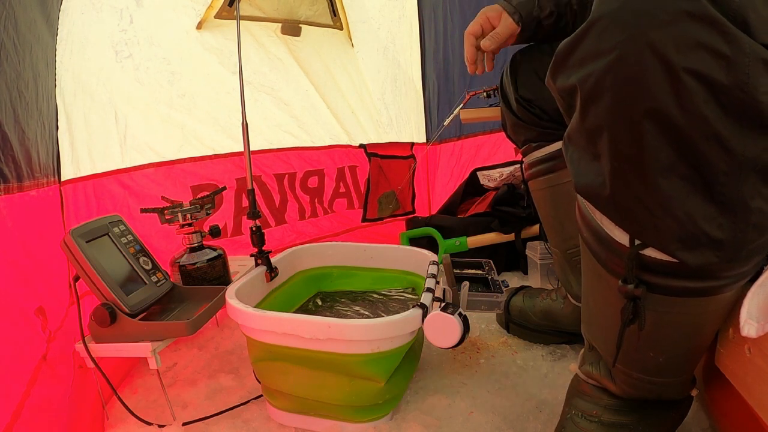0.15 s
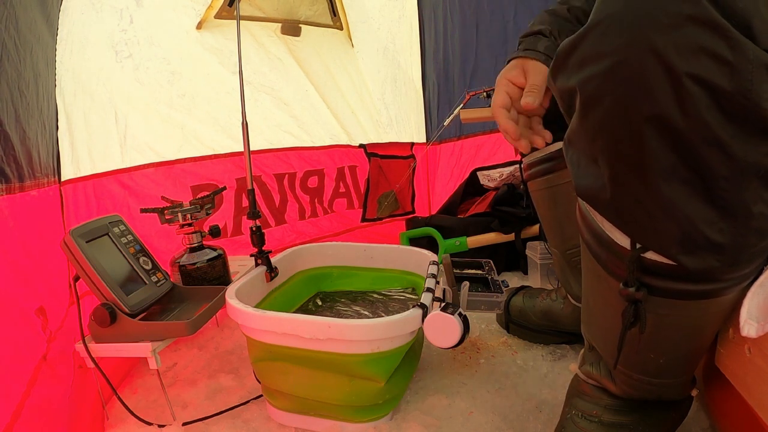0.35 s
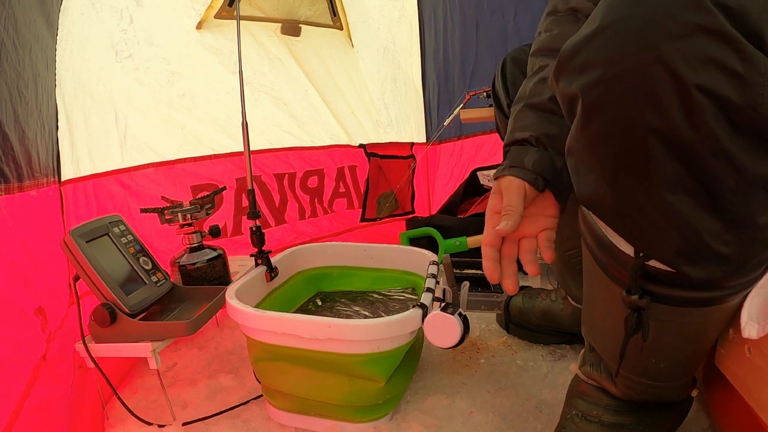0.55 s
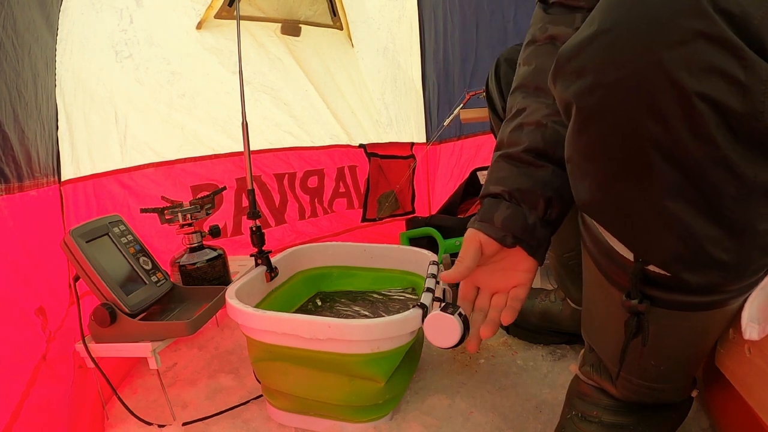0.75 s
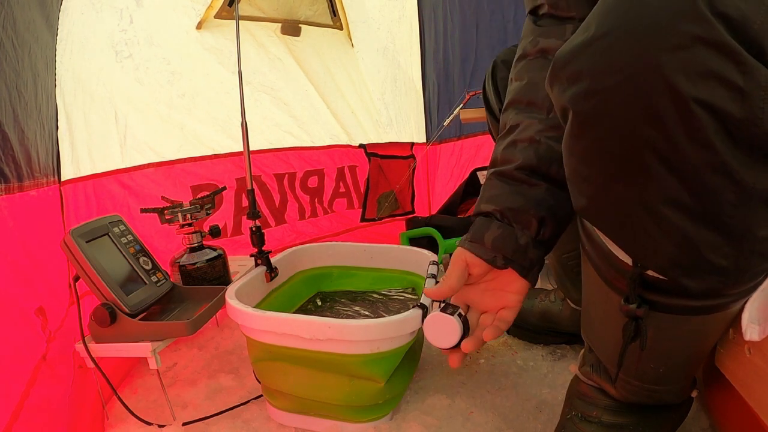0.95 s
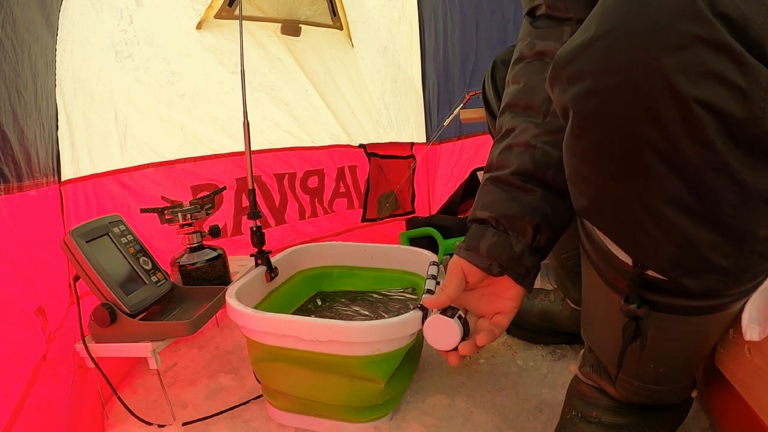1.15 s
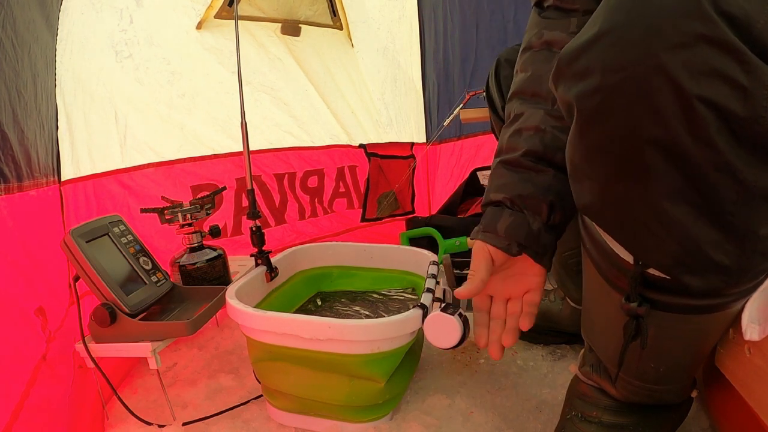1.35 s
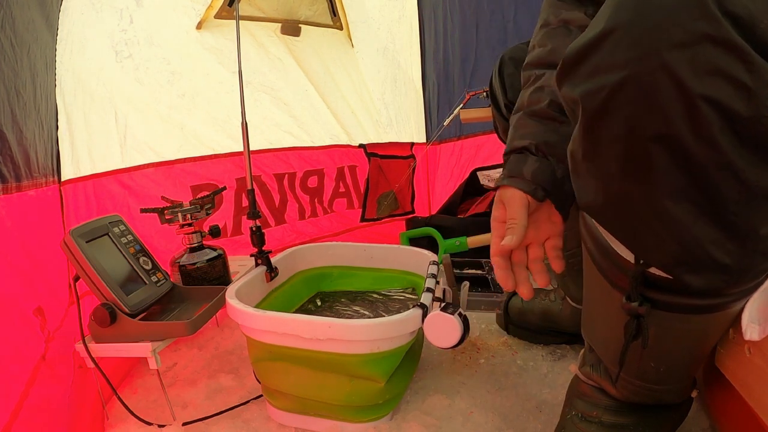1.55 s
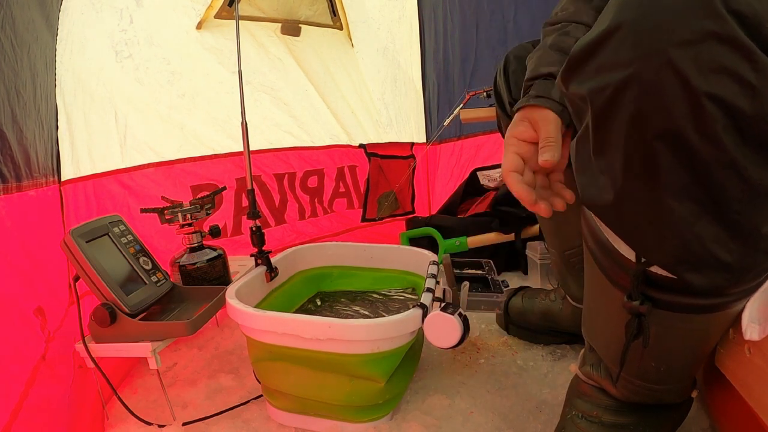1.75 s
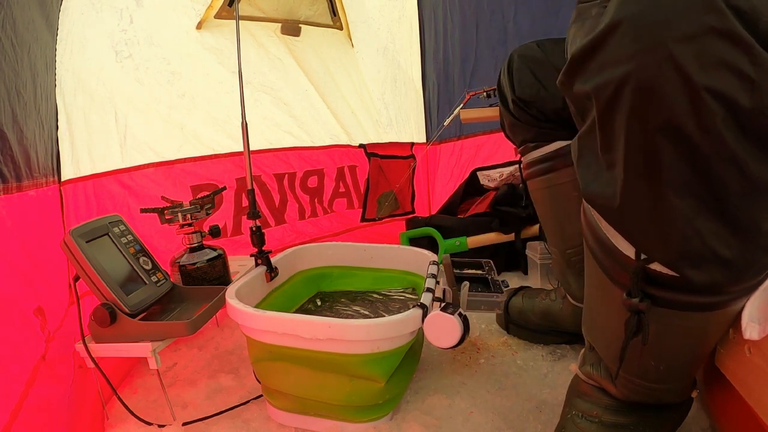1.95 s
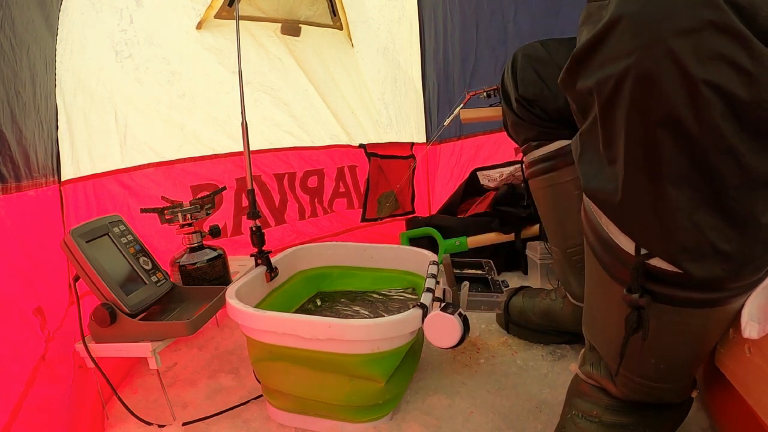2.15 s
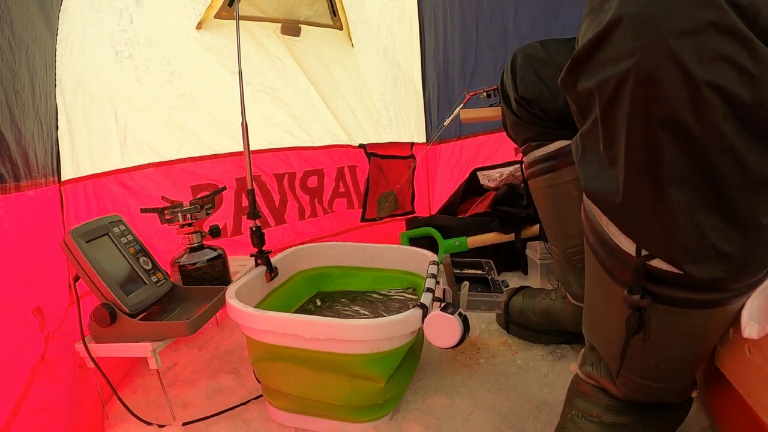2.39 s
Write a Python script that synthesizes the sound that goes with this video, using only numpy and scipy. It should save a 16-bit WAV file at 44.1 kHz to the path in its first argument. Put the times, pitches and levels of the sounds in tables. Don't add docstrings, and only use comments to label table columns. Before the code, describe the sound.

A nylon sleeve swishes down and back, with a creaking plastic seat and a reel's catch clicking

```python
import sys
import numpy as np
from scipy import signal
from scipy.fft import rfft, irfft
from scipy.io import wavfile
from scipy.ndimage import uniform_filter1d

SR = 44100
rng = np.random.default_rng(int(sys.argv[2]) if len(sys.argv) > 2 else 0)


def volts_from_db(level):
    exponent = np.asarray(level, float) / 20
    return 10 ** exponent


def transcribe(u):
    v = np.clip(np.atleast_2d(u).T, -1, 1)
    q = np.round(v * 32767).astype(np.int16)
    wavfile.write(sys.argv[1], SR, q)


N = 112455


def evened(x):
    return x / np.sqrt(np.mean(x ** 2) + 1e-20)


def peaked(x):
    return x / abs(x).max()


def read(points, hz):
    f, value = np.transpose(points)
    return np.interp(np.log(hz + 1), np.log(f + 1), value)


def add(mix, s, sound):
    part = mix[round(s * SR):][:len(sound)]
    part += sound[:len(part)]


def peak(hz, centre_hz, width_hz):
    return 1 / np.sqrt(1 + (2 * (hz - centre_hz) / width_hz) ** 4)


def ring(modes, spread):
    hz, db, t60 = np.transpose(modes)[:, :, None]
    t = np.arange(6000) / SR
    level_chance, pitch_chance = rng.standard_normal((2, len(modes), 1))
    rise_cycles = .8
    rise = 1 - np.exp(-t * hz / rise_cycles)
    decay = volts_from_db(db + 1.5 * level_chance - 60 * t / t60)
    tone = np.sin(2 * np.pi * hz * (1 + spread * pitch_chance) * t)
    return (rise * decay * tone).sum(0)


def pair(a, b, gain):
    # (frequency [Hz], coherence [0-1])
    same = [(100, 0.86), (500, 0.44), (1200, 0.83), (2500, 0.7), (5000, 0.55), (12000, 0.08)]
    # (frequency [Hz], level [dB])
    lean = [(60, 1), (180, 1), (550, -2.5), (1650, 1.5), (4970, 4.5), (15000, -1.5)]
    lag_s = .00005
    hz = np.fft.rfftfreq(N, 1 / SR)
    shared, tilt = read(same, hz), volts_from_db(read(lean, hz) / 2)
    one, two = rfft(a), rfft(b)
    right = shared * one * np.exp(2j * np.pi * hz * lag_s) + np.sqrt(1 - shared ** 2) * two
    return irfft(np.array([one * tilt, right / tilt]) * gain, N)


def swish(speed, colour, folds, grain_db, flicker_db):
    patchy_db = 1.1
    hz, t = np.fft.rfftfreq(N, 1 / SR), np.arange(N) / SR
    flicker = evened(uniform_filter1d(uniform_filter1d(rng.standard_normal(N), 300), 300))
    grains = np.minimum(uniform_filter1d(rng.exponential(1, N), size=3), 5)
    size = volts_from_db(grain_db * grains + flicker_db * flicker)
    a, b = size * rng.standard_normal((2, N))
    singing = sum(volts_from_db(db) * peak(hz, f, width) for f, width, db in folds)
    rubbed = pair(a, b, volts_from_db(read(colour, hz)) * (1 + singing))
    z = signal.stft(rubbed, nperseg=512)[2]
    patches = uniform_filter1d(rng.standard_normal(z.shape[1:]), 5, 0)
    patches = evened(uniform_filter1d(patches, 9, 1))
    cloth = signal.istft(z * volts_from_db(patchy_db * patches), nperseg=512)[1][:, :N]
    level_db = np.interp(t, *np.transpose(speed), left=-120, right=-120)
    return evened(cloth) * volts_from_db(13.5 + level_db)


def reach():
    # (time [s], level [dB])
    speed = [
        (.1, -91),
        (.135, -70),
        (.165, -59),
        (.22, -50.5),
        (.4, -49.5),
        (.57, -47),
        (.71, -48.5),
        (.97, -56.5),
        (1.3, -68),
    ]
    # (frequency [Hz], density [dB per Hz])
    colour = [(100, -8), (500, -18), (800, -18), (1350, -2), (4000, -0.5), (7800, -2), (9500, -12),
              (15000, -24.5)]
    # (frequency [Hz], width [Hz], level [dB])
    folds = [(1520, 250, -12), (2630, 150, -7), (3480, 200, -6), (4350, 250, -10), (7100, 400, -13)]
    return swish(speed, colour, folds, grain_db=1.6, flicker_db=0.61)


def draw_back():
    # (time [s], level [dB])
    speed = [
        (1.3, -74),
        (1.432, -62.5),
        (1.564, -52),
        (1.706, -52),
        (1.856, -52.5),
        (2.016, -50),
        (2.212, -55),
        (2.364, -64.5),
        (2.55, -61.5),
    ]
    # (frequency [Hz], density [dB per Hz])
    colour = [(100, -16), (350, -14.5), (750, -17.5), (1000, -9.5), (3500, -6), (7800, -9), (9500, -19),
              (15000, -32)]
    # (frequency [Hz], width [Hz], level [dB])
    folds = [(1285, 200, -3), (2220, 130, 2), (3070, 100, -5), (5200, 500, -14)]
    return swish(speed, colour, folds, grain_db=3.5, flicker_db=0.25)


def squeak():
    # (time [s], pitch [Hz], level [dB])
    path = [
        (.275, 1400, -58),
        (.298, 1482, -41.5),
        (.316, 1525, -46),
        (.335, 1640, -43.5),
        (.358, 1706, -42.5),
        (.372, 1765, -58),
    ]
    s, hz, db = np.transpose(path)
    t = np.arange(N) / SR
    wobble = 1 + 0.0052 * evened(uniform_filter1d(rng.standard_normal(N), 200))
    phase = 2 * np.pi * np.cumsum(np.interp(t, s, hz) * wobble) / SR
    return volts_from_db(np.interp(t, s, db, left=-140, right=-140)) * np.sin(phase)


def seat():
    # (time [s], peak [dB], tick of the joints [dB], push on the shell [dB])
    slips_on = [(0.558, -27.5, -8, 4.5), (0.575, -25, -4, 3.5), (0.592, -21.5, 1, -3.5),
                (0.61, -20.5, 1, 0.5), (0.622, -19.5, -4, -5), (0.64, -23, 2, 3.5), (0.658, -22, -17, 0.5),
                (0.676, -24.5, -7, 1), (0.698, -17.5, 2, -2.5), (0.719, -19.5, 0.5, -0.5),
                (0.753, -21, -3, 3.5), (0.788, -19, 2.5, -2), (0.829, -18.5, 1.5, -1),
                (0.867, -19.5, 3, 0.5), (0.907, -20, 1.5, -1), (0.928, -21.5, 6.5, 0), (0.94, -21, -0.5, 0),
                (0.961, -21, 3, -5), (0.978, -24, -2, -6.5), (1.008, -19.5, 2.5, -5)]
    # (time [s], peak [dB], tick of the joints [dB], push on the shell [dB])
    slips_off = [(2.034, -27, -15, -0.091), (2.057, -29.5, 5, -1.6), (2.076, -30, -3, -0.87),
                 (2.103, -28.5, 2, -0.99), (2.123, -30, 1, -2.2), (2.145, -28.5, 2, -2),
                 (2.172, -30, -3, -0.94), (2.199, -29.5, -3, -1.4), (2.219, -31.5, -8, -2.2),
                 (2.231, -28, -8, -2), (2.249, -31.5, -5, -0.85), (2.267, -33, -8, -0.26),
                 (2.292, -26.5, 1.5, -2.9)]
    # (frequency [Hz], level [dB], t60 [s])
    rim_modes = [(956, -0.5, 0.054), (1026, 0, 0.044), (1256, 6.5, 0.037), (1442, 4, 0.045),
                 (1899, 2, 0.024), (2217, -5, 0.086), (2783, 2, 0.023), (1630, -4.5, 0.028),
                 (2555, -3.5, .015)]
    # (frequency [Hz], level [dB], t60 [s])
    joint_modes = [(2400, -5, .014), (3250, -2, .014), (3700, -4, .012), (4240, -2, .014), (4760, 1, .016),
                   (5500, -5, .01)]
    # (frequency [Hz], level [dB], t60 [s])
    shell_modes = [(95, -5.5, 0.018), (142, -7, 0.068), (190.6, -4.5, 0.19), (310, 1, 0.064),
                   (426, 11, 0.055), (576.5, 8.5, 0.078), (607, 4, 0.14)]
    chatter_hz, chatter_s, grit, push_s = 949, .0026, .07, .0017
    seat_db, shell_db = -1.5, -7.5
    out, t = np.zeros(N), np.arange(700) / SR
    push = -(t / push_s) * np.exp(-t / push_s)
    for s, db, joints_db, push_db in list(slips_on) + list(slips_off):
        pace, *roughness = rng.standard_normal(701)
        turns = np.floor(t * chatter_hz * (1 + 0.0093 * pace))
        jerks = np.diff(turns, prepend=-1) + grit * np.array(roughness)
        jerks = jerks * np.exp(-(t / chatter_s) ** 2)
        stiff = ring(rim_modes, spread=0.013) + volts_from_db(joints_db) * ring(joint_modes, spread=0.023)
        rim = peaked(signal.fftconvolve(jerks, stiff))
        shell = peaked(signal.fftconvolve(push, ring(shell_modes, spread=0.032)))
        add(out, s, volts_from_db(db + seat_db) * (rim + volts_from_db(shell_db + push_db) * shell))
    return out


def reel():
    # (time [s], peak [dB], bright share [0-1], hold [s], t60 [s])
    clicks = [
        (1.1888, -26, .3, .002, .02),
        (1.1905, -13, 0.0, 0.006, 0.038),
        (1.2412, -34, 0.3, 0.008, .05),
        (1.291, -33, 0.4, 0.002, 0.03),
        (1.297, -35, 0.3, 0.001, 0.02),
        (1.3085, -30, 0.8, 0.003, 0.035),
        (1.3145, -35, .9, 0.001, 0.02),
        (1.3418, -21, 0.75, 0.002, 0.03),
        (1.3468, -23, .9, .003, .045),
        (1.369, -42, .0, 0.003, 0.02),
    ]
    # (frequency [Hz], density [dB per Hz])
    housing = [(800, -30), (1000, -16), (2060, -9), (2600, -13), (4700, -10), (7000, -18), (12000, -30),
               (15000, -48)]
    # (frequency [Hz], density [dB per Hz])
    latch = [(800, -26), (1050, -10), (2500, -14), (3080, -6), (3500, -10), (4850, -3), (11500, -24),
             (14000, -46)]
    # (frequency [Hz], level [dB], t60 [s])
    hollow = [(1000, 0, .045), (1080, -9, .025), (1290, -6, .03), (1750, -11, .025), (1950, -4, .025),
              (2110, -6, .035), (3110, -11, .025), (3456, -10, .025), (4710, -9, .03)]
    snap_s, tick_db, tick_t60 = .0008, 1, .007
    hollow_db, open_damps, thin_hz = 1, .75, 880
    out, t, hz = np.zeros(N), np.arange(6000) / SR, np.fft.rfftfreq(6000, 1 / SR)
    for s, db, bright, hold, t60 in clicks:
        noise = rng.standard_normal((2, 6000))
        body, tick = volts_from_db(-60 * np.maximum(t - hold, 0) / t60), volts_from_db(tick_db - 60 * t / tick_t60)
        shape = np.minimum(t / snap_s, 1) * (body + tick)
        colour = volts_from_db((1 - bright) * read(housing, hz) + bright * read(latch, hz))
        scrape = shape * irfft(rfft(noise[0]) * colour)
        knocks = (t == 0) + 0.034 * noise[1] * (t < hold)
        rung = signal.fftconvolve(knocks, ring(hollow, spread=0.0059))[:6000]
        ringing = volts_from_db(hollow_db) * (1 - open_damps * bright) * peaked(rung)
        add(out, s, volts_from_db(db) * peaked(peaked(scrape) + ringing))
    return signal.sosfilt(signal.butter(8, thin_hz, "high", fs=SR, output="sos"), out)


def tent(x, left_db):
    tail_t60, tent_db = .022, 1.5
    t = np.arange(5000) / SR
    tail = np.diff(rng.standard_normal((2, 5001))) * volts_from_db(-60 * t / tail_t60) * (t > .002)
    wet = signal.fftconvolve(x[None], tail / np.linalg.norm(tail[0]), axes=1)[:, :N]
    direct = np.array([volts_from_db(left_db) * np.roll(x, 2), x])
    return direct + volts_from_db(tent_db) * wet


def bumps():
    # (time [s], peak [dB], pitch [Hz], length [s])
    thuds = [(.125, -59, 470, 0.013), (.222, -51.5, 134, 0.12), (.25, -59, 520, 0.033),
             (0.391, -66, 160, 0.039), (0.427, -53.5, 570, 0.26), (.56, -42.5, 110, 0.26),
             (.9, -42.5, 160, 0.11), (1.027, -61, 390, 0.077), (1, -47, 590, 0.035),
             (1.19, -50.5, 310, .025), (1.15, -52, 190, 0.044), (1.33, -56, 620, 0.043),
             (1.24, -51.5, 186, 0.058), (1.235, -52.5, 510, 0.042), (.45, -49.5, 128, 0.036),
             (.5, -51, 210, 0.07), (1.05, -55, 1340, 0.23), (1.57, -50, 162, 0.12), (1.7, -49, 354, .06),
             (1.72, -59, 230, 0.023), (1.955, -44.5, 117, 0.093), (1.92, -56.5, 650, 0.14),
             (2.03, -42.5, 125, 0.029), (2.07, -50, 180, 0.23), (2.33, -47, 205, 0.036),
             (2.32, -56.5, 420, 0.065), (2.42, -60, 280, .1), (2.37, -56.5, 150, 0.078)]
    out, hz = np.zeros(N), np.fft.rfftfreq(12000, 1 / SR)
    for s, db, pitch_hz, length in thuds:
        u = np.arange(12000) / SR / length
        band = peak(hz, pitch_hz, .55 * pitch_hz)
        puff = evened(irfft(rfft(rng.standard_normal(12000)) * band))
        add(out, s, volts_from_db(db) * puff * np.minimum(u / 0.12, 1) * np.exp(-2 * u ** 2))
    return out


def air():
    # (frequency [Hz], density [dB per Hz])
    air_colour = [(25, 2.5), (150, -9), (750, -20.5), (1000, -9), (1300, -4.5), (1800, -19), (8000, -20),
                  (15000, -40)]
    air_db, drone_db, hum_db, hum_fade_db_per_s, hum_beat_hz = -56.5, -67, -66.5, -4, 40.2
    hz, t = np.fft.rfftfreq(N, 1 / SR), np.arange(N) / SR
    a, b, c, d, e, f = rng.standard_normal((6, N))
    hiss = evened(pair(a, b, volts_from_db(read(air_colour, hz))))
    hum = evened(pair(c, d, peak(hz, centre_hz=1246, width_hz=22)))
    hum = hum * (1 + 0.26 * np.cos(2 * np.pi * hum_beat_hz * t))
    drone = evened(pair(e, f, peak(hz, centre_hz=170.4, width_hz=37)))
    return volts_from_db(air_db) * hiss + volts_from_db(hum_db + hum_fade_db_per_s * t) * hum + volts_from_db(drone_db) * drone


def scene():
    cloth = reach() + draw_back()
    floor = bumps() * volts_from_db([[.4], [-.4]]) + volts_from_db(-15.5) * bumps() * [[1], [-1]]
    return cloth + tent(seat() + squeak(), left_db=0.84) + tent(reel(), left_db=2.1) + floor + air()


def top_cut(x):
    return signal.sosfilt(signal.butter(12, 16140, fs=SR, output="sos"), x)


def record(dry):
    low_cut_hz, top_hz = 77.4, 15100
    dip_hz, dip_width_hz, dip_share = 809, 152, 0.59
    heard = signal.sosfilt(signal.butter(2, low_cut_hz, "high", fs=SR, output="sos"), dry)
    heard = signal.sosfilt(signal.butter(8, top_hz, fs=SR, output="sos"), heard)
    band = signal.lfilter(*signal.iirpeak(dip_hz, dip_hz / dip_width_hz, fs=SR), heard)
    return top_cut(heard - dip_share * band)


dry = scene()
out = record(dry)
transcribe(out)
```